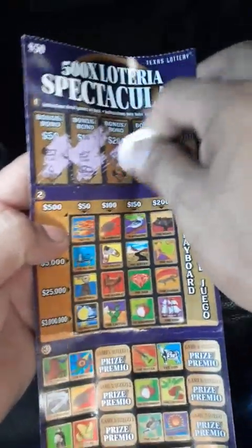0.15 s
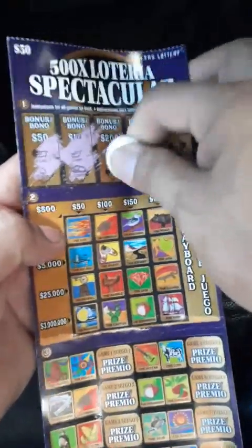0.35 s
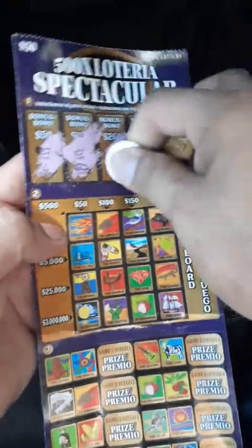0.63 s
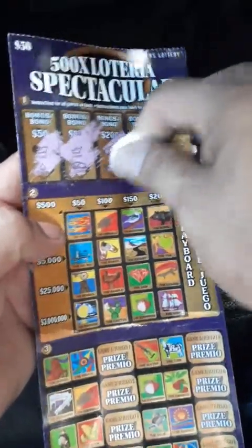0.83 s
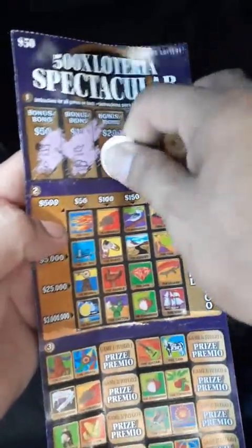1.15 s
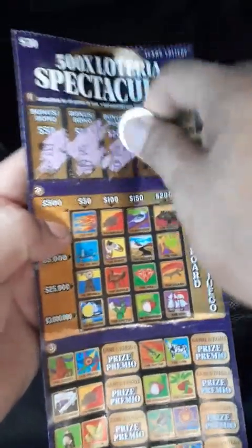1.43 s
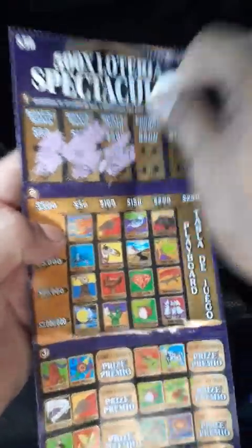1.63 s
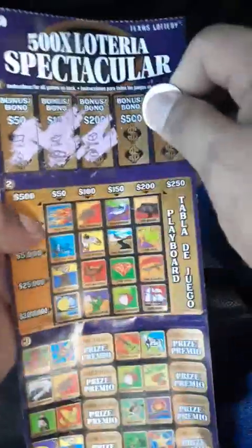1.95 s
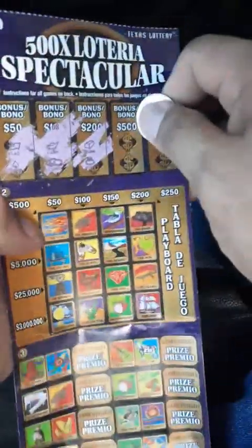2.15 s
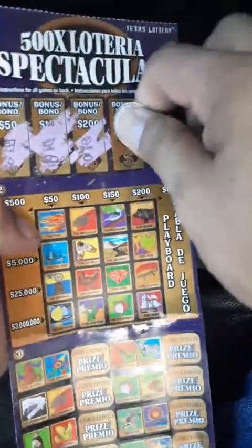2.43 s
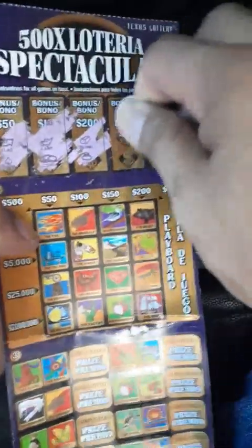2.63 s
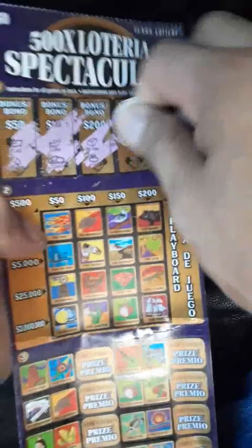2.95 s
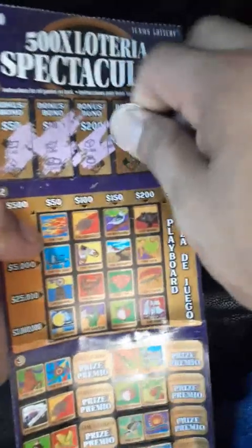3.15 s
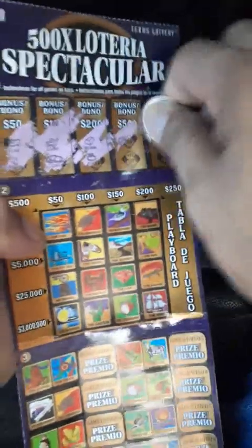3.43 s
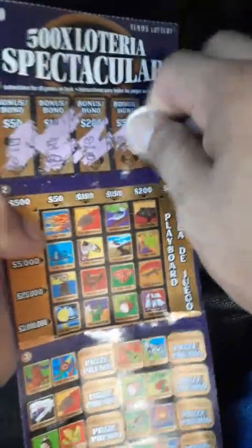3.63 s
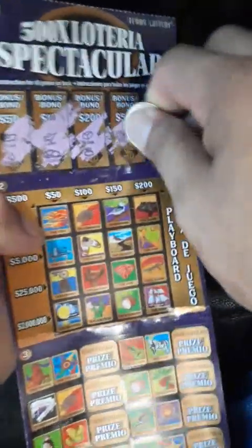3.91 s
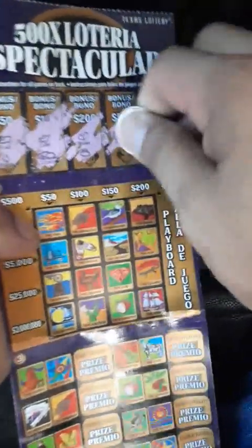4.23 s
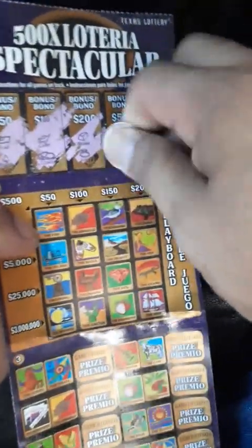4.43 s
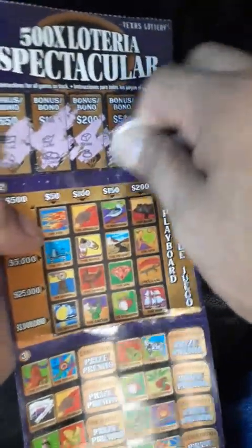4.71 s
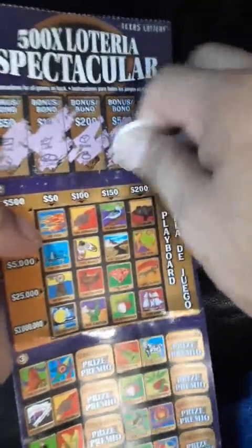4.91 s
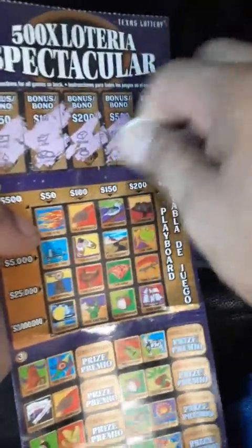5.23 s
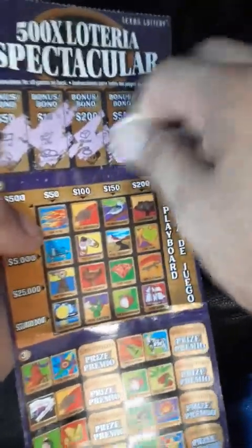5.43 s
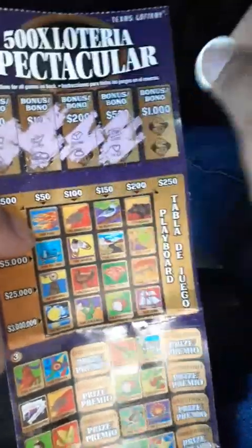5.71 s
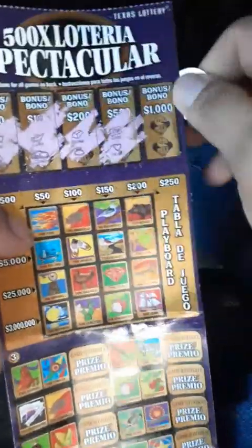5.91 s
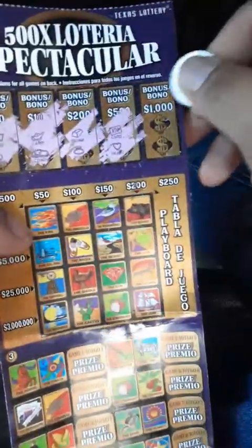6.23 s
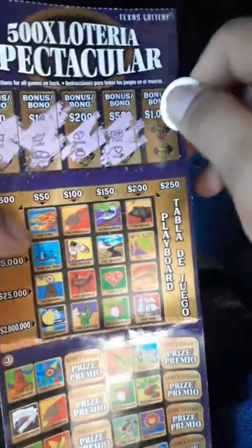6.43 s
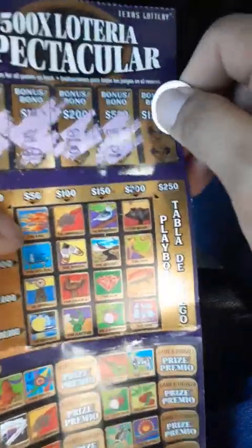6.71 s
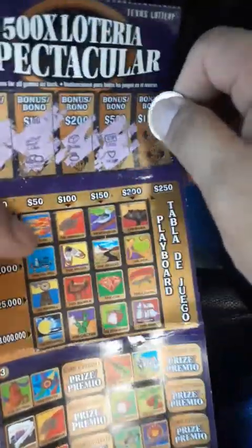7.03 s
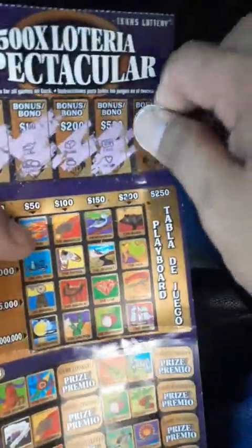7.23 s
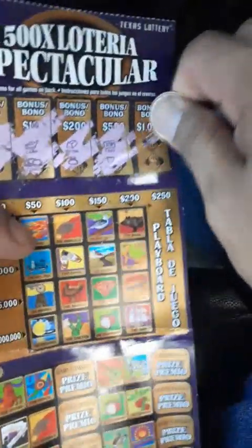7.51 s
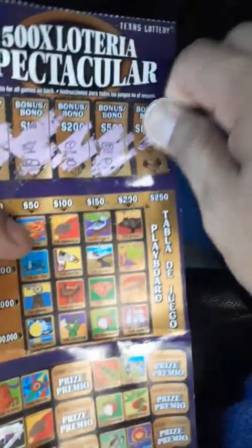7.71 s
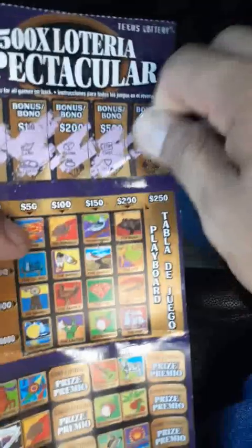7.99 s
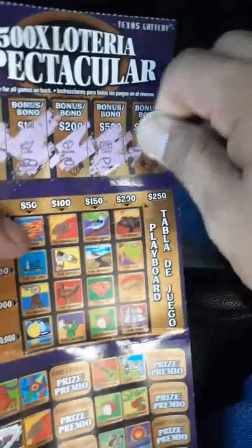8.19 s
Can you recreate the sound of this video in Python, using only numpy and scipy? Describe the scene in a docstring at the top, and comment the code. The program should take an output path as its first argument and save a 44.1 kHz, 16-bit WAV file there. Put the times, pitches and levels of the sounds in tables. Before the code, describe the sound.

Inside a parked car, a coin edge scratches a hand-held card close to the microphone, in short gritty strokes about nine a second. Strokes start lighter, break briefly near two seconds, then run hard and regular until the card snaps. After a near-silent pause with faint finger rustle, scratching resumes. A low engine idle hums throughout.

```python
"""Scraping a card in a parked car

A coin scrapes the coating off a hand-held card in quick strokes: filtered grit, with slips and snaps of the sheet.
Fingers rustle on the card; an eight-cylinder engine idles as locked tones under a dull noise wash, and a seat thuds.
The hand is nearer the right microphone; the left one hears it by two short paths and the small cabin."""
import sys
import numpy as np
from scipy import signal
from scipy.io import wavfile
from scipy.ndimage import uniform_filter1d

SR = 44100
rng = np.random.default_rng(int(sys.argv[2]) if len(sys.argv) > 2 else 0)


def wrap_up_sound(samples):
    """Save the sound to the file named by the first command line argument, as 16-bit audio."""
    columns = np.atleast_2d(samples).T
    # keep every value between -1 and 1, then stretch to whole-number steps
    tamed = np.clip(columns, -1, 1)
    steps = np.round(tamed * 32767).astype(np.int16)
    wavfile.write(sys.argv[1], SR, steps)


N = 368676
HZ = np.fft.rfftfreq(2048, 1 / SR)

# Colour of the card's body: freq_hz, gain_db
CARD_BODY = [(300, -8.5), (600, -8), (1200, -2), (1600, 1.5), (2100, 0), (2500, 0), (3500, -6), (8000, -18)]
# Colour of the scrape around its centre: ratio_to_centre, gain_db
SCRAPE_COLOUR = [(.3, -31.5), (.55, 5.5), (.75, -1.5), (.92, 5.5), (1.1, 2.5), (1.3, -2), (1.8, -5)]
# Colour of the hand at the right microphone: freq_hz, gain_db
RIGHT_COLOUR = [(2200, 1), (2500, -3.5), (3100, 2.5), (3550, -1), (4000, 1.5), (4400, -1.5), (5100, 1.5),
                (5900, 0), (6400, -2.5), (7100, -0.5)]
# Balance of engine and wash: freq_hz, left_minus_right_db
CABIN_LEAN = [(60, -2.5), (180, 0), (310, 2), (540, 0.5), (930, -5.5), (1600, -7.5), (2770, 1.5),
              (4780, -15.5)]


def gain_of(db):
    """Decibels to an amplitude factor."""
    return 10 ** (np.asarray(db) / 20)


def evened(x):
    """Scaled to rms 1."""
    return x / np.sqrt(np.mean(x ** 2) + 1e-20)


def read(points, hz):
    """Reads a table on a log-frequency axis."""
    f, value = np.transpose(points)
    return np.interp(np.log(hz + 1e-3), np.log(f + 1e-3), value)


def add(mix, s, sound):
    """Mixes a sound in at a time in seconds, cut at the end of the mix."""
    part = mix[..., round(s * SR):][..., :sound.shape[-1]]
    part += sound[..., :part.shape[-1]]


def causal(db):
    """Minimum-phase response of a dB curve given from zero to half the sample rate."""
    log = np.log(gain_of(np.r_[db, db[-2:0:-1]]))
    spectrum = np.exp(log - 1j * signal.hilbert(log).imag)
    return np.fft.ifft(spectrum).real[:len(db)]


def grit(size, spread_db):
    """Dense clicks of uneven size, rms 1."""
    unevenness = np.minimum(rng.exponential(1, size), 6)
    return evened(rng.standard_normal(size) * gain_of(spread_db * unevenness))


def drift(size, span):
    """Slow random wander of rms 1, smoothed twice over a span of points."""
    smooth = uniform_filter1d(rng.standard_normal(size), int(span))
    return evened(uniform_filter1d(smooth, int(span)))


def wash():
    """Dull noise of engine bay and vents; the likeness of the two microphones varies with frequency."""
    # Spectral shape, before the overall level is set: freq_hz, density_db_per_hz
    wash_colour = [(28, -50), (34, -34), (47, -24.5), (62, -25.5), (95, -11.5), (150, -15.5), (190, -16),
                   (240, -16.5), (300, -18.5), (338, -15.5), (365, -22), (476, -28.5), (900, -29),
                   (1250, -33), (2370, -54.5), (6870, -67), (8500, -63)]
    # Likeness of the two microphones: freq_hz, correlation (-1 to 1)
    likeness = [(60, 0.27), (250, 1), (400, 0.79), (600, -0.32), (1100, -0.22), (8000, 0.56)]
    level_db = -38.5  # rms over both sides
    frames = N // 512 + 5
    a, b, c, d, patches = rng.standard_normal((frames, 1025, 5)).T
    # the level wanders in patches of time and frequency
    patches = uniform_filter1d(uniform_filter1d(patches, 10, 0), 8, 1)
    patches = evened(patches)
    same = np.clip(read(likeness, HZ), -1, 1)[:, None]
    left = a + 1j * b
    right = same * left + np.sqrt(1 - same ** 2) * (c + 1j * d)
    half_lean_db = read(CABIN_LEAN, HZ)[:, None] / 2
    sides_db = np.array([half_lean_db, -half_lean_db])
    spectra = np.array([left, right])
    spectra *= gain_of(read(wash_colour, HZ)[:, None] + 1.52 * patches + sides_db)
    noise = signal.istft(spectra, nperseg=2048, noverlap=1536)[1][:, :N]
    return gain_of(level_db) * evened(noise)


def engine():
    """Tones at multiples of the idle cycle, locked together; the uneven firings help set their phases."""
    # Idle speed: time_s, full_cycles_per_s
    idle = [(0, 4.998), (0.75, 4.998), (1.25, 4.955), (1.75, 4.991), (2.25, 4.967), (2.75, 4.944),
            (3.25, 4.953), (3.75, 4.972), (4.25, 4.963), (4.75, 4.928), (5.25, 4.937), (5.75, 4.933),
            (6.25, 5.006), (6.75, 5.001), (7.25, 4.93), (7.75, 4.97), (8.36, 4.97)]
    # Tones, before balance and waver: multiple_of_cycle, rms_db
    orders = [(8, -44.3), (11, -41.6), (12, -55.1), (13, -38.5), (14, -48.8), (15, -43.6), (16, -33.4),
              (17, -48.5), (19, -47.6), (21, -49.6), (23, -52.0), (24, -39.1), (27, -45.2), (30, -51.0),
              (31, -53.9), (32, -43.5), (35, -53.0), (43, -54.6)]
    # Strength of the eight firings in order, strong and weak ones mixed: firing_db
    firings_db = [1.5, 5, 5, -1, 2, -4, -4, 3.5]
    t = np.arange(N) / SR
    knots = np.linspace(0, N / SR, 400)
    turns = np.cumsum(np.interp(t, *np.transpose(idle))) / SR + .332
    firing = np.fft.fft(gain_of(firings_db))
    out = np.zeros((2, N))
    for k, db in orders:
        # phase in radians: a narrow lag at order 16 and a square law keep the throb gentle
        lag = 1.5 * np.exp(-((k - 16) / .6) ** 2) - .046 * k ** 2
        waver = drift(400, span=5)  # no two cycles burn alike
        phase = np.angle(firing[round(k) % 8]) - lag + np.interp(t, knots, 0.19 * waver)
        tone = np.sqrt(2) * np.cos(2 * np.pi * k * turns + phase)
        tone *= np.interp(t, knots, gain_of(waver[::-1]))
        half_lean_db = read(CABIN_LEAN, k * idle[0][1]) / 2
        out += gain_of([[db + half_lean_db], [db - half_lean_db]]) * tone
    return out


def thud():
    """A soft bump in the seat: a low push that rings briefly in the cabin, equal on both sides."""
    # The bump: start_s, level_db (before the soft onset), pitch_hz, t60_s
    bump = (2.738, -23, 68, .2)
    s, db, hz, t60 = bump
    t = np.arange(SR // 3) / SR
    onset = np.minimum(t / 0.045, 1) ** 2
    out = np.zeros(N)
    add(out, s, gain_of(db - 60 * t / t60) * np.sin(2 * np.pi * hz * t) * onset)
    return out


def slide():
    """An uneven rustle of skin on card, spread over the whole sheet so that the two sides differ."""
    # Fingers sliding, before waver and balance: time_s, level_db
    finger_level = [(0, -52.5), (1.8, -50.5), (2.0, -51), (2.4, -55.5), (5.62, -52), (5.8, -63),
                    (6.15, -68.5), (6.5, -66.5), (6.7, -50.5), (6.88, -45), (7.05, -47.5), (7.09, -55),
                    (8.36, -59)]
    # Colour of skin on card: freq_hz, gain_db
    finger_tone = [(900, -20), (1500, -0.5), (2500, -8.5), (3500, -8.5), (7300, -9.5), (8500, -10)]
    # Colour of the cupped left hand: freq_hz, gain_db
    cupped_hand = [(1500, -11.5), (2500, 1.5), (3500, -2), (4050, 6), (4700, -0.5), (6000, -6.5),
                   (8000, -2)]
    level_db = np.interp(np.arange(N) / SR, *np.transpose(finger_level))
    level_db += 1.5 * drift(N, span=920)
    hiss = np.array([grit(N, spread_db=2.5), grit(N, spread_db=2.5)])
    tones = np.array([causal(read(finger_tone, HZ) + read(side, HZ)) for side in (cupped_hand, RIGHT_COLOUR)])
    rustle = evened(signal.oaconvolve(hiss, tones, axes=1)[:, :N])
    return gain_of(level_db) * rustle * gain_of([[-1], [1.5]])


def snap(db, hz, crackle):
    """The card buckles: low sheet modes build in about a cycle, climb and die in a few, with a crackle."""
    # Modes of the bent card: multiple_of_ring, level_db
    modes = [(.6, -4), (1.0, 0), (1.6, -3), (2.6, -6)]
    build_cycles = 0.98
    stiffen = .12  # share by which the ring climbs as the sheet stiffens, per cycle up to two
    ring_cycles = 6.5  # the mode at the ring loses 60 dB in this many, higher modes sooner
    crackle_t60_s = .01
    t = np.arange(2000) / SR
    turns = hz * t * (1 + stiffen * np.minimum(hz * t, 2))
    ring = np.zeros(len(t))
    for times, mode_db in modes:
        decay_db = 60 * np.sqrt(times) * turns / ring_cycles
        ring += gain_of(mode_db - decay_db) * np.sin(2 * np.pi * times * turns)
    ring *= np.minimum(hz * t / build_cycles, 1)
    burst = gain_of(-60 * t / crackle_t60_s) * grit(len(t), spread_db=5)
    return gain_of(db) * (crackle * burst / abs(burst).max() - (1 - crackle) * ring / abs(ring).max())


def stroke(start, length, db, peak):
    """Coin grit drives card and scrape, brighter with speed; the edge bites fast, pressure swells and lifts."""
    # The hold, for a stroke of usual strength: time_s, body_minus_scrape_db, scrape_centre_hz
    hold = [(0, 3, 4280), (1, 3.5, 4520), (1.6, 5.5, 4280), (1.9, -4, 4630), (2.5, 1, 4610), (4, 0, 4520),
            (4.5, -1, 4700), (5.4, -1, 4780), (5.6, 4, 4700), (6.5, -6.5, 5140), (7.1, 0, 4630),
            (7.45, -0.5, 4040), (8.36, 1.5, 4300)]
    usual_db = -40
    sweep = 0.23  # the slow scrape is centred lower by this share
    times, bodies_db, centres_hz = np.transpose(hold)
    # a harder stroke is thinner and brighter
    body_db = np.interp(start, times, bodies_db) - 0.45 * (db - usual_db)
    centre_hz = np.interp(start, times, centres_hz) + 20.5 * (db - usual_db)

    u = np.linspace(0, 1, round(length * SR * 1.098))  # the stroke lasts a little over its nominal length
    size = len(u)
    skew = np.log(.5) / np.log(np.clip(peak, .15, .85))
    swell = np.sin(np.pi * u ** skew) ** 1.82
    contact = np.clip(u * length / 0.0068, 0, 1) * np.clip((1 - u) * length / 0.019, 0, 1)
    # flakes of coating breaking away
    flakes = grit(size, spread_db=3.5) * contact * gain_of(1.2 * drift(size, span=110))
    fast = evened(flakes * (0.036 + swell) * gain_of(3 * drift(size, span=250)))
    slow = evened(flakes * (.5 - 0.13 * swell) * gain_of(1.8 * drift(size, span=150)))
    bend = evened(flakes * (0.69 + swell) * gain_of(2 * drift(size, span=250)))

    grip_db = 1.5 * drift(len(HZ), span=7)  # each grip damps other modes of the card
    parts = [(fast, read(SCRAPE_COLOUR, HZ / centre_hz), 0),
             (slow, read(SCRAPE_COLOUR, HZ / centre_hz / (1 - sweep)), -12),
             (bend, read(CARD_BODY, HZ), body_db)]
    sound = 0
    for drive, tone_db, part_db in parts:
        response = causal(tone_db + grip_db)
        response /= np.linalg.norm(response)
        sound = sound + gain_of(db + part_db) * signal.fftconvolve(drive, response)
    return sound


def slips():
    """The coin edge sticks and slips at even gaps before a stroke: (start_s, tick) pairs that ring the card."""
    start_s, gap_s, count = 2.218, .0168, 9
    first_db, last_db, spread_db = -24.5, -21, 1.5  # before the cabin
    tick = causal(np.maximum(read(CARD_BODY, HZ), read(SCRAPE_COLOUR, HZ / 4700) - 9))
    tick /= abs(tick).max()
    levels_db = first_db + (last_db - first_db) * np.linspace(0, 1, count) ** 4
    levels_db += spread_db * rng.standard_normal(count)
    return [(start_s + k * gap_s, -gain_of(db) * tick) for k, db in enumerate(levels_db)]


def cabin(x, side_db, colours):
    """Right hears the hand directly, left by two paths; both get a short tail, drawn anew for each sound."""
    # Paths to the left microphone, before tilt and balance: delay_s, level_db
    left_paths = [(.0002, -8), (.00113, -13.5)]
    t = np.arange(4000) / SR
    tail = rng.standard_normal((2, len(t))) * gain_of(-60 * t / 0.063) * (t > .0015)
    paths = tail / np.linalg.norm(tail[0]) * gain_of([[-3], [-11]])
    paths[1, 0] += 1  # direct sound on the right
    for (s, db), chance in zip(left_paths, rng.standard_normal(len(left_paths))):
        paths[0, round(s * SR)] += gain_of(db + 5 * chance)  # the card's tilt favours one path or the other
    paths[0] *= gain_of(side_db) / np.linalg.norm(paths[0])
    paths = signal.fftconvolve(paths, colours, axes=1)[:, :len(t)]
    return signal.fftconvolve(x[None], paths, axes=1)


def hand():
    """Strokes, slips and snaps, each heard from where the hand then is."""
    # Coin strokes: start_s, nominal_length_s, scrape_db (before the cabin), peak_place (0-1)
    strokes = [(.004, 0.042, -40, 0), (.108, 0.076, -39.5, 0.36), (.2, 0.015, -56, 0.4),
               (0.228, .11, -40.5, 0.53), (.407, 0.073, -46, 0.52), (0.529, 0.073, -41.5, 0.45),
               (0.653, 0.09, -44, 0.58), (0.756, 0.01, -58, .5), (0.784, 0.091, -38, 0.28),
               (0.935, 0.056, -56, .4), (1.035, 0.053, -38, 0.56), (1.116, 0.11, -47, 0.37),
               (1.251, 0.062, -32.5, 0.36), (1.345, 0.075, -37, 0.34), (1.455, 0.065, -38, 0.34),
               (1.528, .098, -34.5, 0.35), (1.649, 0.087, -51, 0.33), (1.88, 0.015, -46.5, 0.6),
               (2.15, 0.076, -45.5, 0.67), (2.352, 0.078, -36.5, 0.35), (2.472, 0.078, -44, 0.54),
               (2.585, 0.056, -34.5, 0.47), (2.69, 0.088, -44.5, 0.45), (2.799, 0.076, -32.5, .45),
               (2.911, 0.091, -40.5, 0.38), (3.024, .073, -31.5, 0.54), (3.127, 0.091, -46, 0.35),
               (3.242, 0.076, -32.5, 0.46), (3.347, 0.096, -37, 0.62), (3.469, 0.082, -29.5, 0.32),
               (3.595, 0.074, -42.5, 0.42), (3.683, .076, -31.5, 0.44), (3.8, 0.086, -40, 0.34),
               (3.915, .069, -35, .55), (4.015, 0.093, -38, 0.64), (4.136, 0.065, -37, 0.4),
               (4.251, 0.064, -47.5, 0.48), (4.336, 0.075, -31.5, 0.67), (4.452, 0.075, -36.5, 0.52),
               (4.551, 0.084, -32.5, 0.37), (4.668, 0.084, -38, 0.41), (4.782, .066, -36, 0.44),
               (4.885, 0.073, -35, 0.59), (4.987, 0.079, -32, 0.37), (5.108, 0.058, -36, 0.73),
               (5.209, 0.059, -34.5, 0.89), (5.317, 0.079, -45.5, 0.6), (5.431, 0.058, -33, 0.39),
               (5.516, 0.11, -28.5, 0.56), (5.829, .044, -49, 0), (6.308, .047, -68, .5),
               (6.364, 0.044, -63, 0.4), (6.548, 0.041, -59, 0.5), (6.586, 0.085, -47, .5),
               (6.982, 0.014, -45.5, 0.4), (7.119, 0.072, -36.5, 0.36), (7.23, 0.078, -42.5, 0.5),
               (7.341, .062, -38, 0.49), (7.448, .063, -51, 0.46), (7.537, 0.072, -33, 0.46),
               (7.65, .062, -41.5, .55), (7.749, 0.074, -35, 0.57), (7.856, 0.071, -46.5, 0.51),
               (7.961, 0.075, -35, 0.52), (8.064, 0.072, -44, 0.64), (8.171, 0.068, -34.5, 0.52),
               (8.268, 0.07, -41, 0.57)]
    # Snaps of the card: start_s, level_db (before the cabin), ring_hz (at onset), crackle_share (0-1)
    snaps = [(1.3592, -18, 900, 0.36), (1.55, -19, 610, 0.1), (1.5622, -9, 1100, 0.6),
             (1.569, -20, 800, .3), (3.8018, -17, 1100, 0.1), (4.1372, -7.5, 666, 0.24),
             (5.611, -15.5, 930, 0.5), (5.615, -9.5, 810, 0.27), (5.6267, -10.5, 800, 0.68),
             (6.31, -27.5, 694, 0.44), (6.8924, -27.5, 500, 0.1), (6.9505, -28.5, 790, .2),
             (6.966, -30, 1190, 0.6)]
    # The hand drifts to the right: time_s, left_minus_right_db (before colours and the right tail)
    hand_side = [(0, -10), (1.2, -12), (2.3, -13.5), (5.6, -13), (8.36, -13.5)]
    # Colour of the hand at the left microphone: freq_hz, gain_db
    left_colour = [(300, -16.5), (600, 8.5), (1100, 3), (1550, -9), (2300, 11.5), (3300, 6), (4300, 2.5),
                   (5500, 2), (8000, 2)]
    events = [(max(s - .002, 0), stroke(s, *rest)) for s, *rest in strokes]  # begun 2 ms early
    events += slips()
    events += [(s, snap(*rest)) for s, *rest in snaps]
    colours = np.array([causal(read(side, HZ)) for side in (left_colour, RIGHT_COLOUR)])
    out = np.zeros((2, N))
    for s, sound in events:
        side_db = np.interp(s, *np.transpose(hand_side))
        add(out, s, cabin(sound, side_db, colours))
    return out


def scene():
    """Everything in the cabin, left and right."""
    return hand() + slide() + engine() + wash() + thud()


def record(dry):
    """The microphones lose the top; then a steep low-pass limits the band."""
    # Treble loss of the microphones: freq_hz, gain_db
    mic_top = [(7000, 0), (7500, -3), (8000, -12.5), (8600, -22)]
    edge_hz = 8780
    dull = signal.oaconvolve(dry, causal(read(mic_top, HZ))[None], axes=1)[:, :N]
    low_pass = signal.firwin(511, edge_hz, window=("kaiser", 9), fs=SR)
    return signal.oaconvolve(dull, low_pass[None], "same")


dry = scene()
out = record(dry)
wrap_up_sound(out)
```